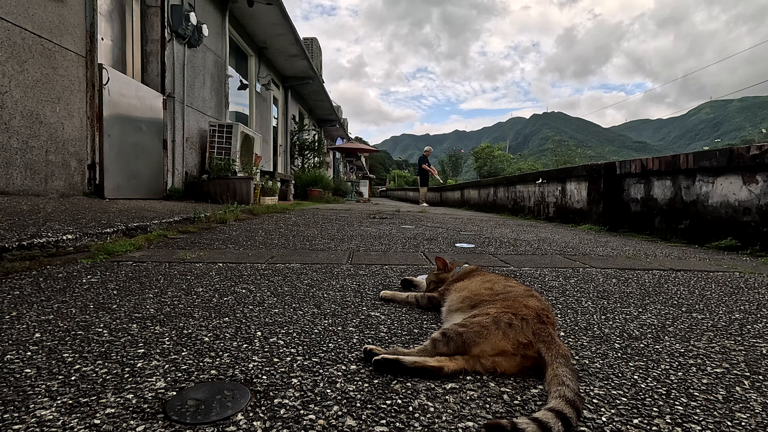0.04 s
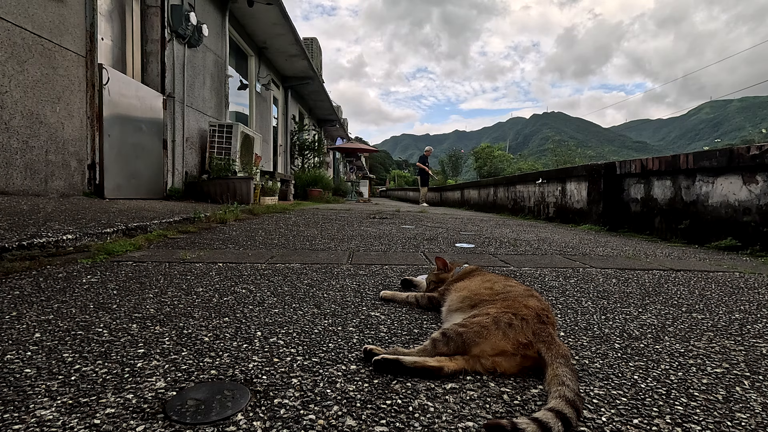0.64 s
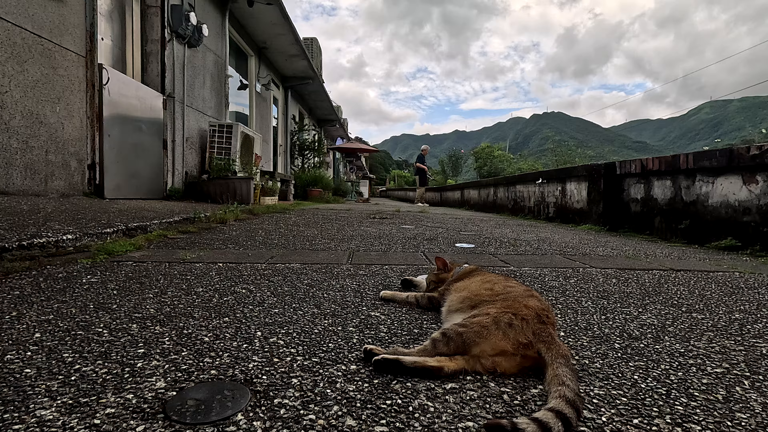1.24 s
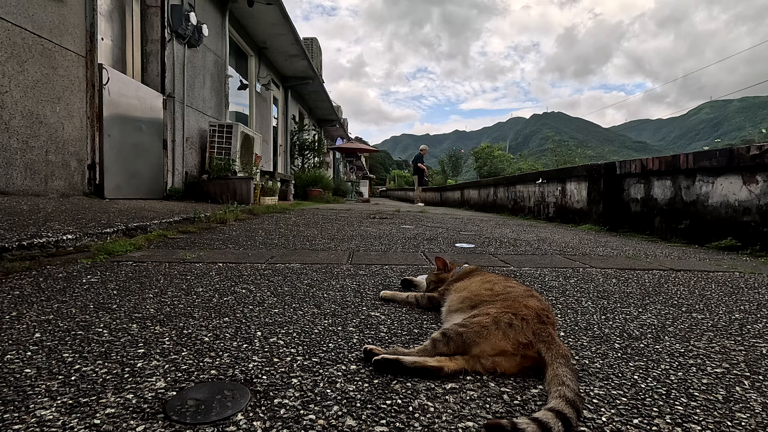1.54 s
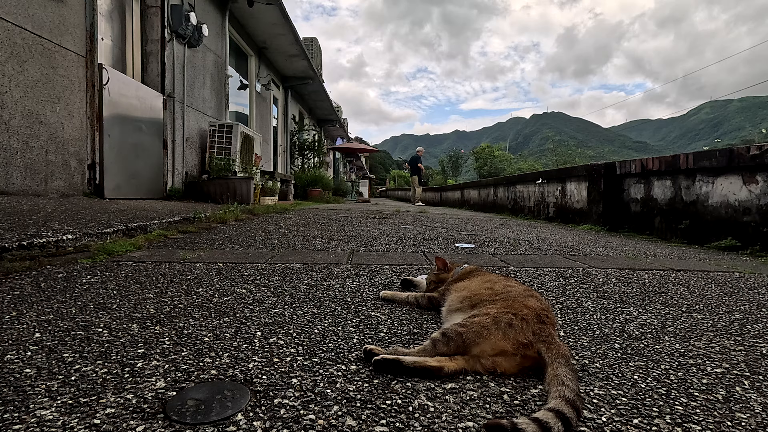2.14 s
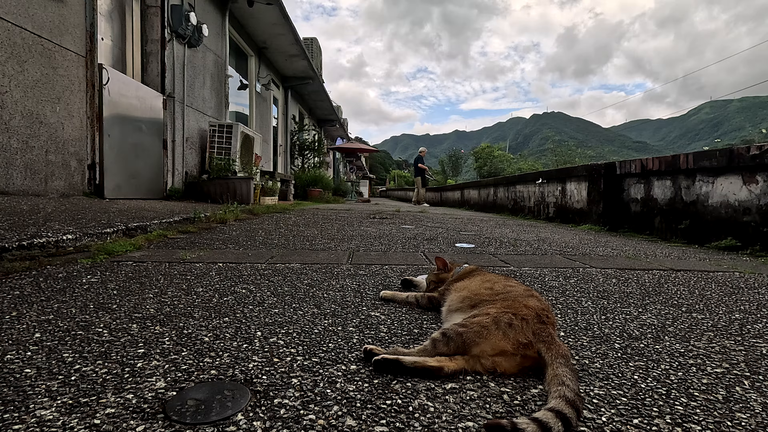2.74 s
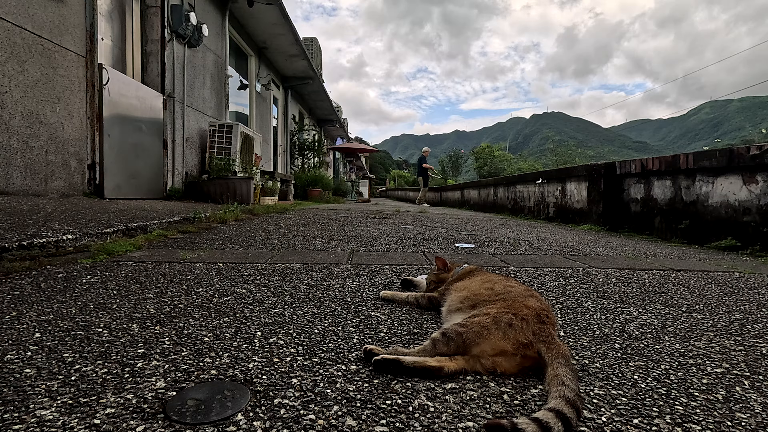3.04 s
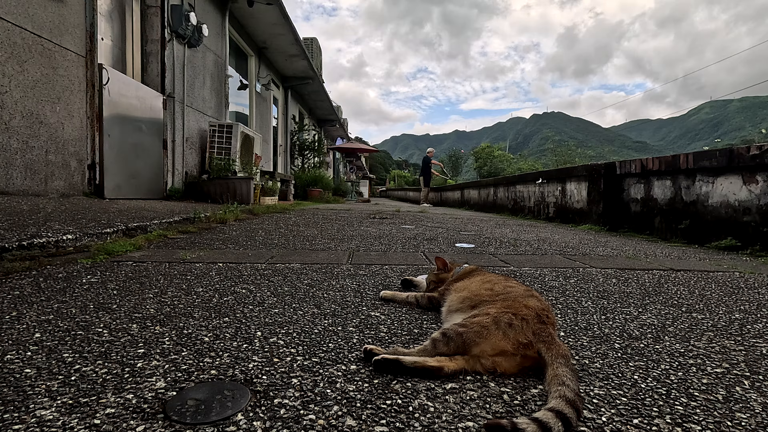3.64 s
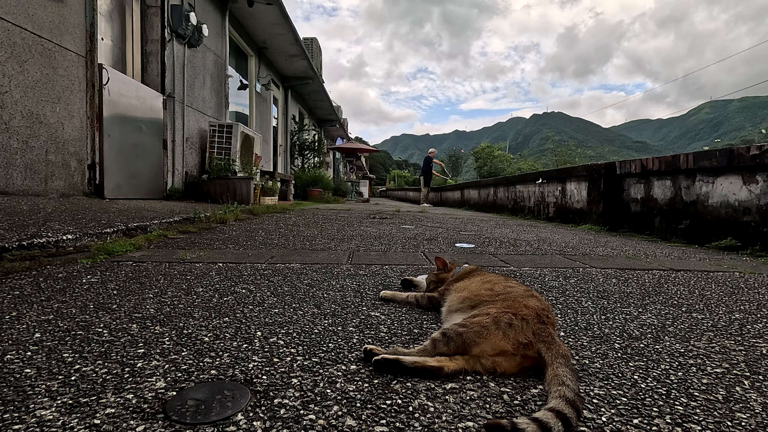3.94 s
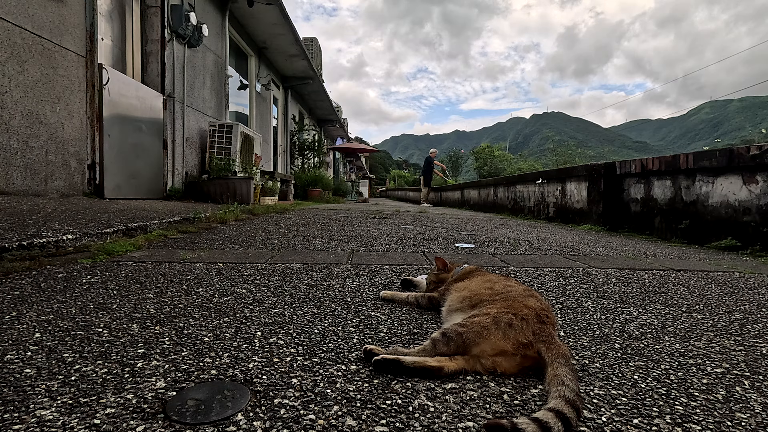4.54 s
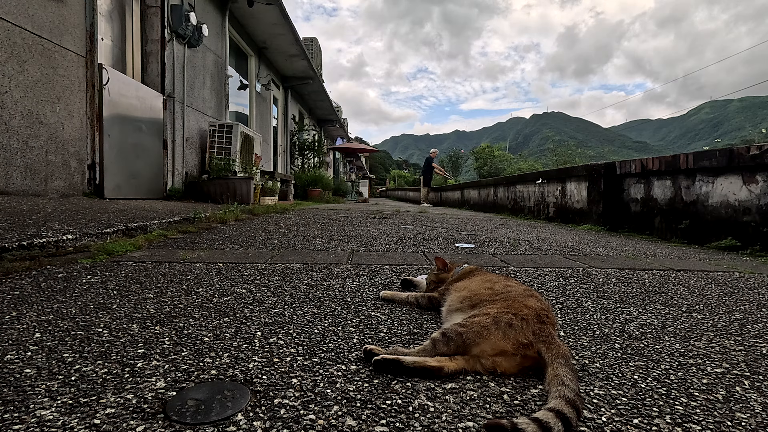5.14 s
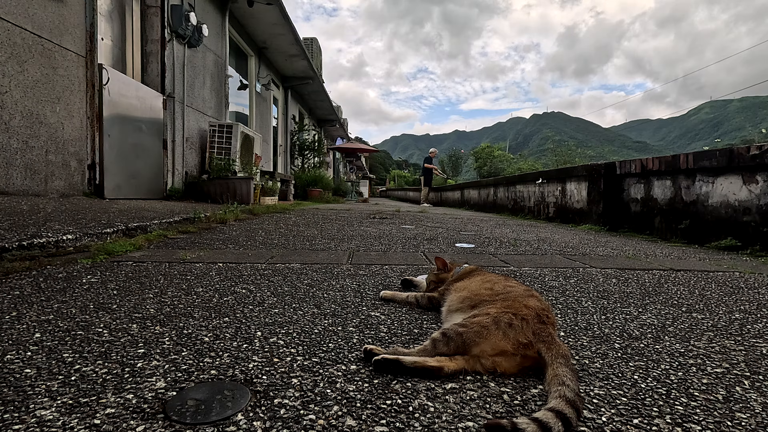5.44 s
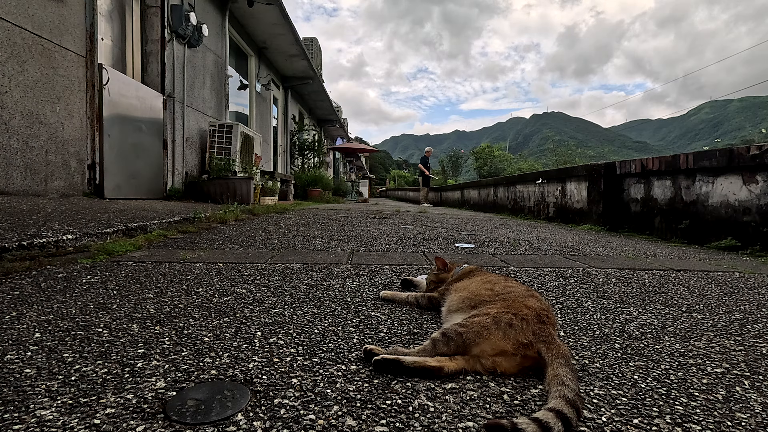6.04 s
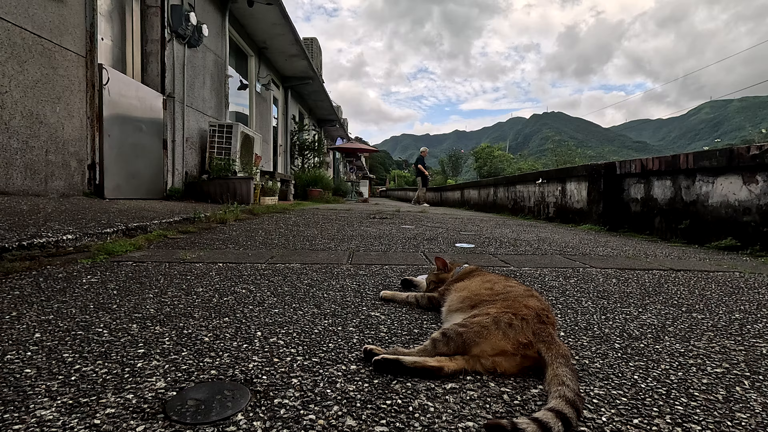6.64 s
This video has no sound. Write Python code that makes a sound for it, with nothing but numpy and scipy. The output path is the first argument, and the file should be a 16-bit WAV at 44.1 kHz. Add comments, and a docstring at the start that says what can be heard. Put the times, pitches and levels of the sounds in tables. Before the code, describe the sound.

In a concrete lane, an air conditioner hums softly over a low rumble of air and faint cicadas. Right at the start something hard snaps shut like a latch, with a brief echo off the walls. Far birds whistle faintly. Past the middle an animal gives two quick runs of rasping calls, the second louder, and another sharp snap follows at once.

```python
"""Concrete lane with cicadas

An air conditioner hums beside a building, light air rumbles and cicadas pulse in the hills.
Twice something hard snaps shut, like a latch, and the walls answer. Far birds whistle among hoarse
far calls. An unseen animal gives two quick runs of rasping calls, each a pulse train that speeds up."""
import sys
import numpy as np
from scipy import signal
from scipy.fft import rfft, irfft, next_fast_len
from scipy.io import wavfile
from scipy.ndimage import map_coordinates

SR = 44100
rng = np.random.default_rng(int(sys.argv[2]) if len(sys.argv) > 2 else 0)


def pcm_store(signal):
    """Save signal as 16-bit PCM."""
    levels = np.round(np.clip(np.atleast_2d(signal), -1, 1) * 32767)
    wavfile.write(sys.argv[1], SR, levels.astype(np.int16).T)


N = 300308


def amp(db):
    """Decibels to gain."""
    return 10 ** (np.asarray(db) / 20)


def unit(x):
    """Scale to rms 1."""
    return x / np.sqrt(np.mean(x ** 2) + 1e-20)


def along(points, hz):
    """Interpolate (frequency [Hz], value) points on a log axis."""
    f, v = np.transpose(points)
    return np.interp(np.log(hz + 1), np.log(f), v)


def wobble(rate_hz):
    """Smooth random curve through rate_hz knots a second."""
    knots = rng.standard_normal(int(N * rate_hz / SR) + 4)
    return map_coordinates(knots, [np.arange(N) * rate_hz / SR])


def running_phase(hz):
    """Phase [rad] of a frequency curve."""
    return 2 * np.pi * np.cumsum(hz) / SR


def coloured(x, spectrum):
    """Minimum-phase filter from (frequency [Hz], gain [dB]) points; white noise keeps its power."""
    m = 2 * next_fast_len(N)
    gain = unit(amp(along(spectrum, np.fft.rfftfreq(m, 1 / SR))))
    cepstrum = irfft(np.log(gain + 1e-6))
    cepstrum[1:m // 2] *= 2
    cepstrum[m // 2 + 1:] = 0
    return irfft(rfft(x, m) * np.exp(rfft(cepstrum)))[..., :N]


def gliding(x, spectrum, stretch):
    """Moving filter: the spectrum's frequencies scale with a stretch curve."""
    frames = dict(nperseg=256, noverlap=192, nfft=512)
    hz, t, z = signal.stft(x, SR, **frames)
    gain = amp(along(spectrum, hz[:, None] / np.interp(t, np.arange(N) / SR, stretch)))
    gain /= np.sqrt(np.mean(gain ** 2, axis=0))
    return signal.istft(z * gain, SR, **frames)[1][:N]


def stereo_noise(spectrum, coherence):
    """Noise of rms 1 with a given spectrum and left-right coherence."""
    angle = np.arccos(np.clip(along(coherence, np.fft.rfftfreq(N, 1 / SR)), -1, 1)) / 2
    mid, side = irfft(rfft(rng.standard_normal((2, N))) * [np.cos(angle), np.sin(angle)], N)
    return unit(coloured(np.array([mid + side, mid - side]), spectrum))


def pan(left_db):
    """Channel gains for a left-right level difference."""
    return unit(amp([[left_db / 2], [-left_db / 2]]))


def swell(start_s, length_s, rise_s, fade_s):
    """Rise from 0 to 1, hold until the length is over, then fade."""
    t = np.arange(N) / SR - start_s
    return np.clip(t / rise_s, 0, 1) * np.clip(1 - (t - length_s) / fade_s, 0, 1)


def latest_event(events):
    """Per sample: age [s] of the latest event, then its other columns."""
    t, rows = np.arange(N) / SR, np.array(events)
    index = np.maximum(np.searchsorted(rows[:, 0], t, side="right") - 1, 0)
    start_s, *columns = rows[index].T
    return t - start_s, *columns


# wall reverberation (frequency [Hz], t60 [s])
WALL_DECAY = [(300, 0.34), (2000, 0.47), (5000, 0.37), (12000, 0.28)]


def lane(x, early_db, early_t60_s, tail_db):
    """Direct sound, quick wall scatter much alike in both channels, and a diffuse tail."""
    hz, t, z = signal.stft(rng.standard_normal((2, SR // 2)), SR, nperseg=256)
    tail = signal.istft(z * amp(-60 * t / along(WALL_DECAY, hz)[:, None]), SR, nperseg=256)[1]
    t = np.arange(tail.shape[1]) / SR
    early = rng.standard_normal(len(t)) + 0.77 * rng.standard_normal(tail.shape)
    early *= amp(-60 * t / early_t60_s)
    response = amp(early_db) * early / np.linalg.norm(early[0])
    response += amp(tail_db) * tail / np.linalg.norm(tail[0])
    return x + signal.fftconvolve(x[None], response, axes=1)[:, :N]


# fan lines (frequency [Hz], level [dB])
FAN_LINES = [(165.3, -60.5), (248.1, -53.5), (496, -74.5)]
# airflow spectrum (frequency [Hz], gain [dB])
AIRFLOW = [(12, -28), (22, -6), (70, -4), (110, -5), (165, -5.5), (220, -9.5), (290, -9.5), (490, -20),
           (720, -27), (1040, -21), (1510, -27.5), (2130, -30.5), (2800, -35), (3500, -43), (4550, -55)]
# airflow stereo image (frequency [Hz], coherence [0-1])
AIRFLOW_COHERENCE = [(30, 0.95), (100, 1), (260, 0.87), (600, 0.71), (1100, 0.58), (3000, 0.17)]


def air_conditioner():
    """Steady fan lines over a lumpy rumble of moving air; a band near 1 kHz flutters."""
    speed = 1 + 0.002 * wobble(5)
    hum = sum(amp(db + 0.87 * wobble(4.07)) * np.sqrt(2) * np.sin(running_phase(hz * speed))
              for hz, db in FAN_LINES)
    air = stereo_noise(AIRFLOW, AIRFLOW_COHERENCE) * amp(-49 + 0.85 * wobble(3.11) + 1.1 * wobble(18))
    flutter = np.zeros((2, N))
    for hz, db in [(950, -66.5), (1050, -66.5), (1150, -68)]:
        flicker = unit(amp(4.2 * wobble(32)))
        band = [(hz / 2, -80), (hz * 0.87, -22), (hz, 0), (hz * 1.14, -22), (hz * 2, -80)]
        flutter += amp(db) * flicker * stereo_noise(band, coherence=[(1000, 0.81)])
    return (hum + air + flutter) * pan(-0.4)


def breeze():
    """Light air buffets the microphone in low lumps."""
    lumps = unit(amp(3.5 * wobble(14) + 1.5 * wobble(2)))
    spectrum = [(12, -26), (28, -0.5), (85, -3.5), (150, -14), (300, -44), (900, -92)]
    return amp(-57.5) * lumps * stereo_noise(spectrum, coherence=[(60, 0.96)])


def bout_envelope(bouts, lag_s):
    """Cicada level and throb depth: both grow with the effort of a bout, the depth sooner."""
    effort = sum(swell(start_s + lag_s, length_s, rise_s=1, fade_s=0.6) for start_s, length_s, _ in bouts)
    level_db = -66 + 5 * effort
    depth_db = 1.8 + 1.2 * np.sqrt(effort)
    return level_db, depth_db


# nearest cicada's bouts (start [s], length [s], throb rate [Hz])
BOUTS = [(-.183, 2.83, 16.42), (5.335, 1.5, 17.25)]
# its body resonances (frequency [Hz], gain [dB])
BODY_SPECTRUM = [(3500, -54), (5000, -15), (6200, -3.5), (7700, -3), (8800, -13.5), (10500, -8.5),
                 (11400, 0.5), (12100, 8), (12800, -2.5), (13400, -17), (14300, -20), (16000, -57)]
# far chorus (frequency [Hz], gain [dB])
CHORUS_SPECTRUM = [(1760, -36), (3000, -10), (3270, -11.5), (3530, -6.5), (5350, 3), (6210, -3),
                   (6710, -6.5), (7830, -10.5), (8840, -22.5), (9500, -14.5), (12400, -32), (20900, -120)]


def cicadas():
    """A steady far chorus, and a nearer insect whose clicking tymbals throb as its abdomen pumps."""
    age_s, length_s, throb_hz = latest_event(BOUTS)
    sag_hz_per_s = 6  # the throb slows after a bout
    throb = 2 * np.pi * (throb_hz * age_s - sag_hz_per_s * np.maximum(age_s - length_s, 0) ** 2 / 2)
    tymbal = running_phase(np.linspace(339.5, 344, N) + 0.5 * wobble(8))
    clicks = unit(np.diff(tymbal // (2 * np.pi), prepend=0))
    buzz = unit(lane(clicks - clicks.mean(), early_db=6, early_t60_s=0.02, tail_db=0))
    buzz = unit(buzz + 1.1 * rng.standard_normal((2, N)))
    level_db, depth_db = bout_envelope(BOUTS, lag_s=0)
    high_note = unit(coloured(buzz, BODY_SPECTRUM)) * amp(level_db + depth_db * np.cos(throb))
    # the note drops at the end of each throb
    low_band = [(7000, -66), (9200, -22), (9900, 10.5), (10500, 3), (11800, -25), (14000, -69)]
    level_db, depth_db = bout_envelope(BOUTS, lag_s=0.65)
    low_note = unit(coloured(buzz, low_band)) * amp(level_db - 14 + 2 * depth_db * np.cos(throb - 2.2))
    hiss = stereo_noise(CHORUS_SPECTRUM, coherence=[(4000, 0.32), (9000, 0.86)])
    chorus = unit(hiss + 0.47 * coloured(buzz, CHORUS_SPECTRUM)) * amp(-59.5 + 0.26 * wobble(1.7))
    return chorus * pan(0.21) + high_note * pan(15.4) + low_note * pan(6)


# latch contacts (time [s], relative level [dB])
CONTACTS = [(0.127, -39.5), (0.1646, -24.5), (.178, -9), (0.2988, -40), (.372, -40.5), (5.0465, -15.5),
            (5.0647, -10.5), (5.1846, -43), (5.4408, -39)]
# metal modes (frequency [Hz], relative level [dB], t60 [s])
LATCH_MODES = [(2580, 7, 0.25), (3050, -7, 0.23), (3650, -18, 0.083), (3752, 1.5, 0.31), (5070, 11, 0.22),
               (6040, -3, 0.19), (6440, 21, 0.11)]
# spectrum of each snap (frequency [Hz], gain [dB])
FIRST_SNAP_SPECTRUM = [(150, -18), (300, -22), (500, -18.5), (900, -19), (1250, -4), (1900, -4),
                       (2700, -0.5), (3400, -3.5), (3750, 3), (4200, -3.5), (5200, 0), (8400, -16.5),
                       (10100, -20), (15000, -43)]
SECOND_SNAP_SPECTRUM = [(330, -26), (590, -13.5), (850, -17.5), (1200, -6.5), (2000, -3.5), (2900, 2.5),
                        (3800, 4), (5300, -1), (6600, -4), (8400, -13.5), (10100, -16.5), (15000, -43)]
# dull knocks after the first snap (time [s], level [dB])
KNOCKS = [(.205, -34), (0.255, -40.5)]


def latch():
    """Each contact is a sharp crack, a crackling rattle and a faint ring of the metal."""
    t = np.arange(SR // 2) / SR
    cracks, rings, knocks = np.zeros((3, N + SR))
    rattle_t60_s, knock_t60_s = 0.14, 0.079
    for time_s, db in CONTACTS:
        rattle = rng.standard_normal(len(t)) * amp(-15 - 60 * t / rattle_t60_s)
        rattle *= amp(1.8 * wobble(900)[:len(t)])
        rattle[0] = -amp(8)  # the crack
        # loose parts keep disturbing the ring
        drift = np.cumsum(0.05 * rng.standard_normal((len(LATCH_MODES), len(t))), axis=1)
        ring = sum(amp(mode_db - 60 * t / t60_s) * np.sin(2 * np.pi * hz * t + phase)
                   for (hz, mode_db, t60_s), phase in zip(LATCH_MODES, drift))
        cracks[round(time_s * SR):][:len(t)] += amp(db) * rattle
        rings[round(time_s * SR):][:len(t)] += amp(db - 40) * ring
    for time_s, db in KNOCKS:
        knock = amp(db - 60 * t / knock_t60_s) * rng.standard_normal(len(t))
        knocks[round(time_s * SR):][:len(t)] += knock
    snaps = np.where(np.arange(N) < N // 2,
                     coloured(cracks[:N], FIRST_SNAP_SPECTRUM),
                     coloured(cracks[:N], SECOND_SNAP_SPECTRUM))
    thuds = coloured(knocks[:N], [(90, -35), (190, 0.5), (320, -1), (520, -25), (1500, -42)])
    return lane(snaps + rings[:N], early_db=-11.5, early_t60_s=0.017, tail_db=-9) + thuds


# bird notes (start [s], length [s], start pitch [Hz], end pitch [Hz], relative level [dB])
BIRD_NOTES = [(0.468, 0.115, 3360, 3280, -63.5), (0.904, 0.11, 3540, 4150, -61),
              (1.03, .08, 3400, 3660, -64), (1.32, .09, 3350, 3620, -66), (2.32, .12, 3380, 4200, -58.5),
              (2.72, 0.134, 3250, 3430, -60), (3.459, 0.11, 3380, 3290, -61),
              (5.88, 0.064, 3400, 3260, -69)]


def birds():
    """Thin gliding whistles, smeared by distance."""
    notes = np.zeros(N)
    for start_s, length_s, start_hz, end_hz, db in BIRD_NOTES:
        n = int(length_s * SR)
        glide_hz = np.linspace(start_hz, end_hz, n) * (1 + 0.012 * wobble(400)[:n])
        notes[round(start_s * SR):][:n] += amp(db) * np.hanning(n) * np.sin(running_phase(glide_hz))
    return amp(-3) * lane(notes, early_db=-3, early_t60_s=0.08, tail_db=0)


# far calls (start [s], length [s], level [dB])
HOARSE_CALLS = [(0.54, 0.18, -62), (0.818, 0.091, -64.5), (1.848, 0.13, -65.5), (3.12, .2, -68),
                (3.33, 0.29, -64.5), (5.495, 0.46, -67.5)]


def far_calls():
    """Hoarse calls that distance blurs into soft swells around 2 kHz."""
    band = [(700, -84), (1300, -24), (1800, -2), (2150, 2), (2500, -7.5), (3300, -41), (5000, -78)]
    power = sum((amp(db) * swell(start_s, length_s, rise_s=0.057, fade_s=0.28)) ** 2
                for start_s, length_s, db in HOARSE_CALLS)
    return stereo_noise(band, coherence=[(2000, 0.57)]) * np.sqrt(power)


def mouth(calls, open_s=0.085, shut_ratio=0.88):
    """In each call the mouth opens (0-1); pulse rate and throat resonance rise with it."""
    age_s, length_s, _, _, first_hz, full_hz, open_hz = latest_event(calls)
    progress = np.clip(age_s / np.minimum(open_s, 0.75 * length_s), 0, 1)
    opening = np.sin(np.pi / 2 * progress) ** 2
    pulse_hz = first_hz + (full_hz - first_hz) * opening
    throat_hz = open_hz * (shut_ratio + (1 - shut_ratio) * opening)
    return opening, pulse_hz, throat_hz


def voice_pulses(pulse_hz, jitter, alternation, scatter_db, noise_shares):
    """Strong and weak pulses in turn, ragged when slow, with puffs of noise; one mix per share."""
    ragged = pulse_hz.mean() / pulse_hz
    phase = running_phase(pulse_hz * (1 + jitter * ragged ** 2 * wobble(180)))
    onsets = np.flatnonzero(np.diff(phase // (2 * np.pi)))
    strength = 1 + alternation * (-1) ** np.arange(len(onsets))
    strength *= amp(scatter_db * ragged[onsets] * rng.standard_normal(len(onsets)))
    pulses = np.bincount(onsets, unit(strength) * np.sqrt(SR / pulse_hz[onsets]), N)
    puffs = unit(rng.standard_normal(N) * np.exp(np.cos(phase)))
    return [np.sqrt(1 - share) * pulses + np.sqrt(share) * puffs for share in noise_shares]


def push(start_s, length_s, rise_s=0.027, release_db_per_s=642):
    """Gain of one call: quick swell, hold, steep release."""
    t = np.arange(N) / SR - start_s
    attack = np.clip(t / min(rise_s, 0.33 * length_s), 0, 1)
    return attack * amp(-release_db_per_s * np.clip(t - length_s, 0, 1))


# throat resonating at THROAT_HZ, slack in run 1, tight in run 2 (frequency [Hz], gain [dB])
THROAT_1 = [(500, -30), (1100, -37), (1400, -16), (1650, -8), (1950, 7), (2250, 1), (2500, -11),
            (2800, -13), (3400, -26), (4800, -62)]
THROAT_2 = [(500, -52), (1080, -24), (1400, -23.5), (1650, -15), (1850, 0.5), (2000, 4), (2170, -5),
            (2380, -9), (2650, -17.5), (3200, -26), (4500, -65)]
# upper resonances in runs 1 and 2 (frequency [Hz], gain [dB])
RASP_1 = [(2500, -10.5), (3600, -12), (4100, -2), (4550, 7.5), (5300, -12), (6400, -0.5), (7400, -6),
          (8200, -15), (9000, -0.5), (9700, -16), (11000, -32), (15000, -38)]
RASP_2 = [(2500, -41), (3500, -11), (4100, -13.5), (4800, -5.5), (5800, 1.5), (6600, -3), (7300, -8.5),
          (8100, -21.5), (8950, -9.5), (9700, -21.5), (11000, -31), (15000, -49)]
# calls (start [s], length [s], relative throat level [dB], relative rasp level [dB],
#        first pulse rate [Hz], full pulse rate [Hz], open throat resonance [Hz])
RASPING_CALLS = [ (3.582, 0.012, -50.5, -63.5, 100, 100.6, 2110),
                 (3.614, 0.032, -41, -67, 99.5, 109.4, 1870), (3.669, .05, -35, -54, 135.5, 199.5, 1944),
                 (3.747, 0.07, -35.5, -48.5, 200.2, 303.8, 1890),
                 (3.877, .097, -41.3, -53, 219.9, 239, 1810), (4.146, .036, -40, -51, 170.2, 212.4, 2301),
                 (4.204, 0.073, -32.5, -46, 165.5, 297.9, 2128),
                 (4.309, 0.1, -31.5, -41.5, 164.3, 319.7, 2018),
                 (4.492, .126, -29.3, -38.3, 160, 321.5, 2082),
                 (4.697, .127, -30.2, -38.3, 160.2, 333, 2090),
                 (4.917, .123, -31.2, -42, 165.4, 318.8, 2038), ]
THROAT_HZ, RUN_2_START_S, SHUT_RASP_DB = 1965, 4.08, -7.5


def animal():
    """Vocal pulses ring a throat resonance that rises as the mouth opens; the rasp above it grows."""
    opening, pulse_hz, throat_hz = mouth(RASPING_CALLS)
    clean, rough = voice_pulses(pulse_hz, jitter=0.019, alternation=0.33, scatter_db=1.1,
                                noise_shares=[0.32, 0.6])
    stretch = throat_hz / THROAT_HZ
    in_run_2 = np.arange(N) / SR > RUN_2_START_S
    throat = np.where(in_run_2,
                      amp(-3) * gliding(clean, THROAT_2, stretch),
                      amp(-3.5) * gliding(clean, THROAT_1, stretch))
    rasp = np.where(in_run_2,
                    amp(-3.5) * gliding(rough, RASP_2, stretch ** 0.14),
                    amp(-0.5) * gliding(rough, RASP_1, (stretch / 0.97) ** 0.2))
    rasp *= amp(SHUT_RASP_DB * (1 - opening))
    calls = np.zeros((2, N))
    for start_s, length_s, throat_db, rasp_db, *_ in RASPING_CALLS:
        voice = push(start_s, length_s) * (amp(throat_db) * throat + amp(rasp_db) * rasp)
        calls += lane(voice, early_db=1.5, early_t60_s=0.058, tail_db=-7)
    return calls * pan(0.84)


def scene():
    """Everything heard in the lane."""
    events = animal() + latch() + birds() + far_calls()
    return events + cicadas() + air_conditioner() + breeze()


def record(dry):
    """Brick-wall low-pass."""
    cutoff_hz = 15200
    return irfft(rfft(dry) * (np.fft.rfftfreq(N, 1 / SR) < cutoff_hz), N)


dry = scene()
out = record(dry)
pcm_store(out)
```